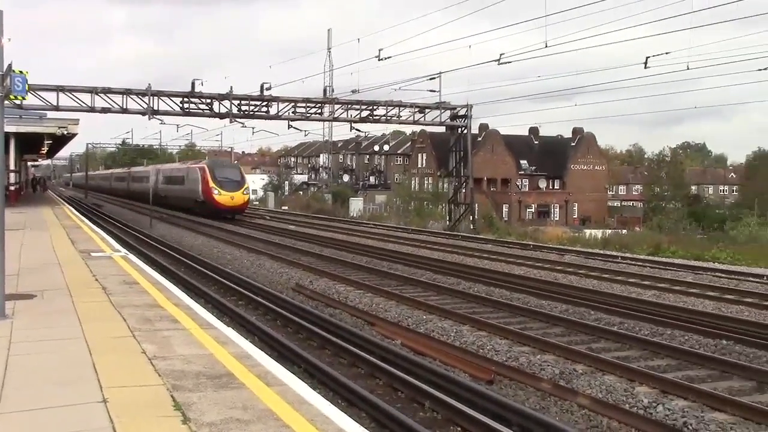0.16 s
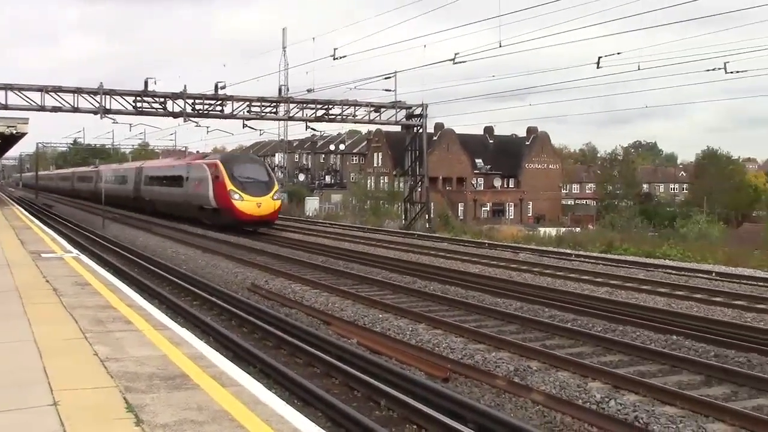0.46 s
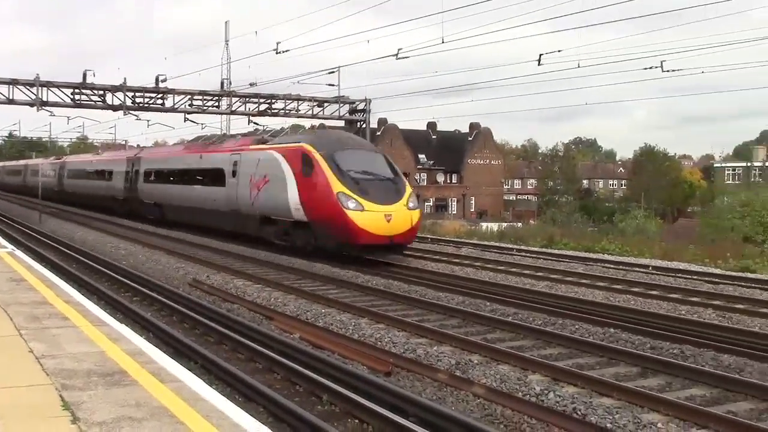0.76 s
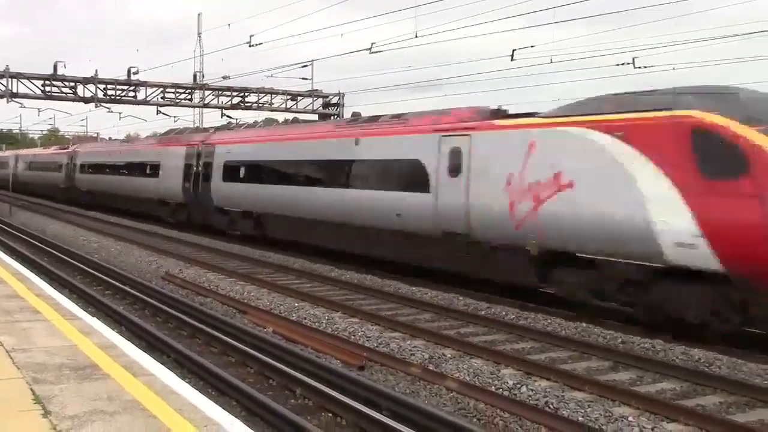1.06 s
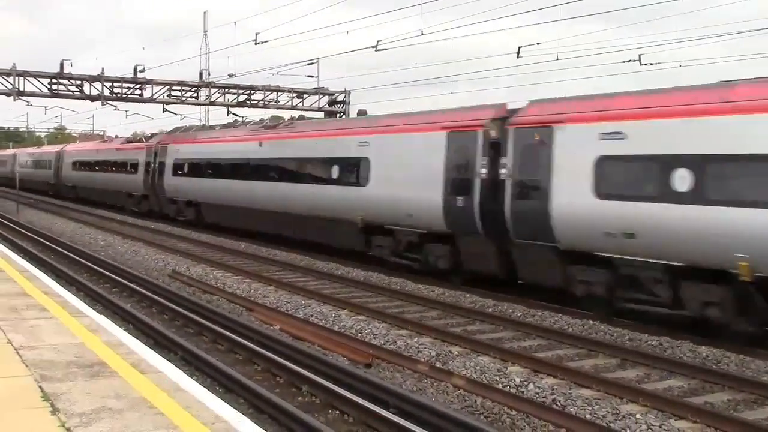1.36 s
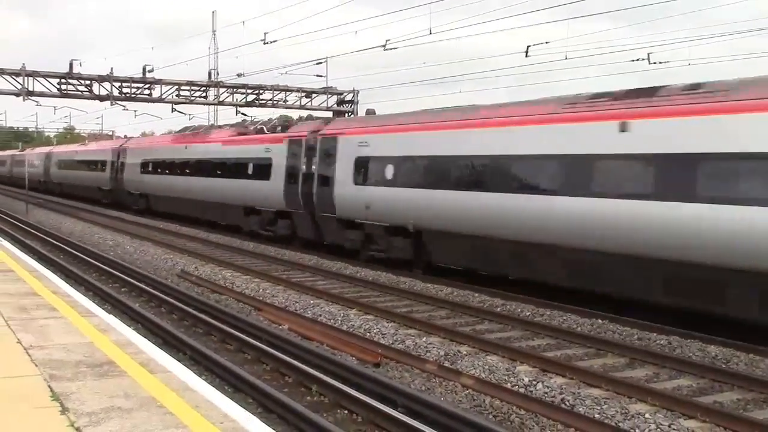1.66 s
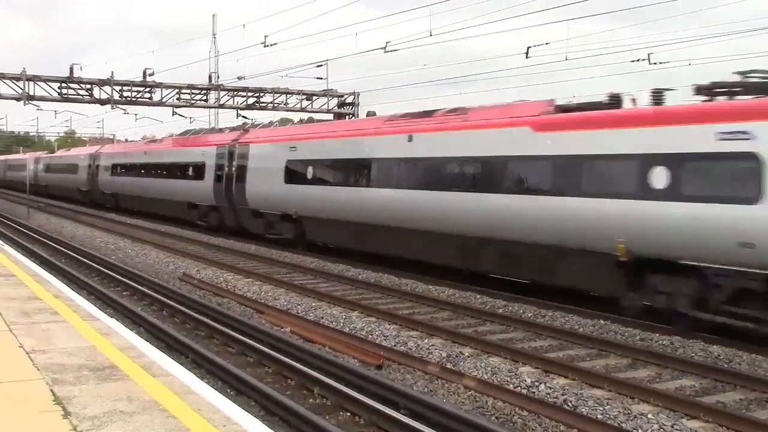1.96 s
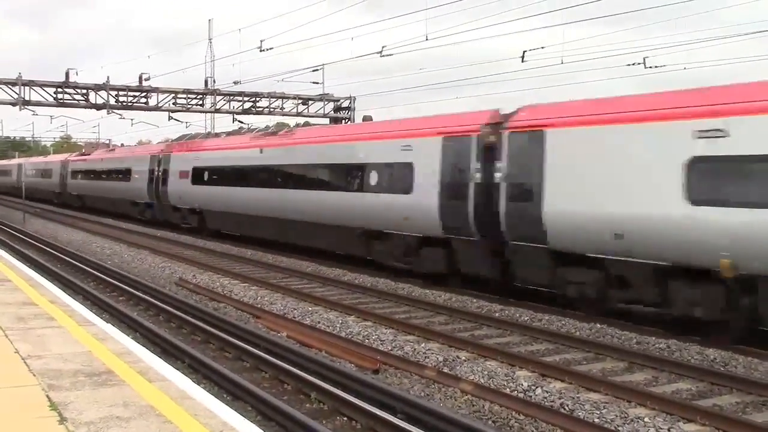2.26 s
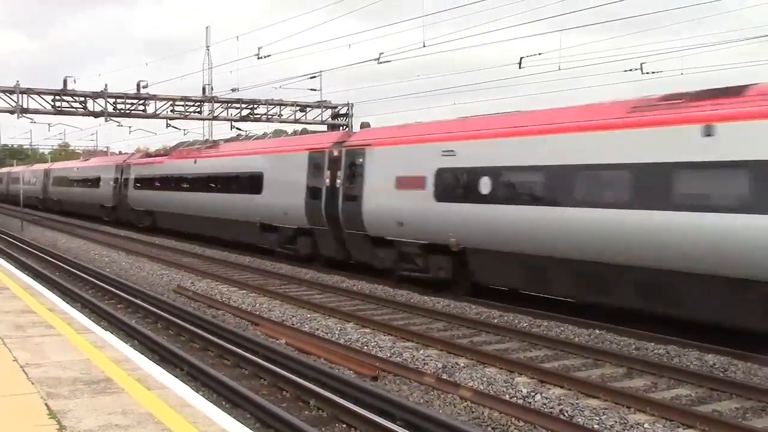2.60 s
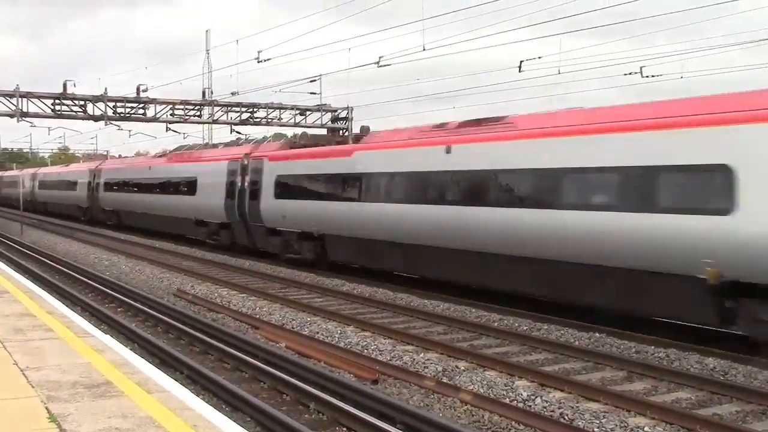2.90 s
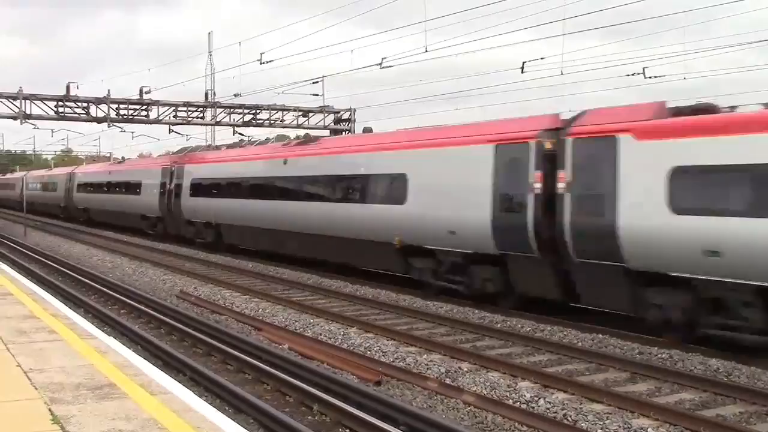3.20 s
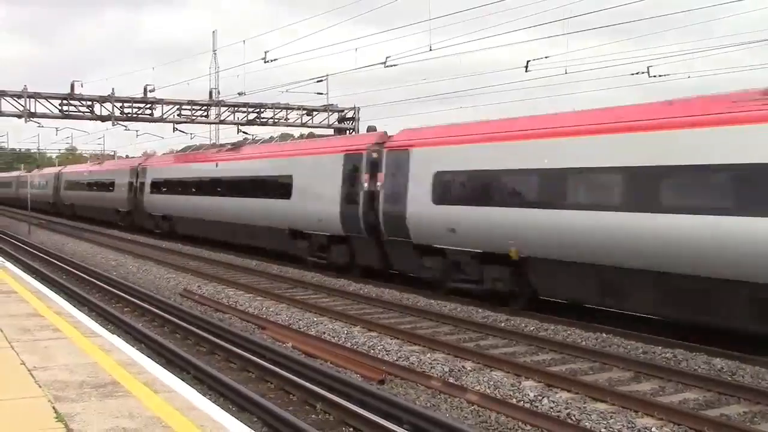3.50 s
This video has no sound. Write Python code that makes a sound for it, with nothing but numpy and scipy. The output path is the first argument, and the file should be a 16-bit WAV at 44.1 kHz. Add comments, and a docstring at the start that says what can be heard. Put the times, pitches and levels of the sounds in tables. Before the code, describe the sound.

High-speed train passing near the platform, metallic wheel rings sliding down in pitch over rail roar.

```python
"""On a station platform, the microphone about ten metres from the track: a fast electric train passes.
Its nose pushes a swell of air, the rails sing at fixed pitches, and each wheelset rings with a tone
that slides down as it goes by, over rumble, roar, rush and hiss. Whines and whistles join in.
Broad sounds are coloured noise under level curves; tones are resonances driven by noise,
with Doppler shift, distance and beam worked out for the sources that pass the microphone."""
import sys
import numpy as np
from scipy.fft import rfft, irfft
from scipy.io import wavfile
from scipy.ndimage import uniform_filter1d, minimum_filter1d

SR = 44100
rng = np.random.default_rng(int(sys.argv[2]) if len(sys.argv) > 2 else 0)


def pcm_store(signal):
    """Save signal as 16-bit PCM."""
    levels = np.round(np.clip(np.atleast_2d(signal), -1, 1) * 32767)
    wavfile.write(sys.argv[1], SR, levels.astype(np.int16).T)


N = 160965  # length in samples

# Rolling noise as the train passes. Each row: time in seconds, then levels of rumble, rail roar,
# upper rail ring, rush and hiss, each in dB before its trim.
ROLLING_LEVELS = [(0.0, -34, -36, -22.5, -33.5, -33), (0.06, -35.5, -25.5, -24, -35, -33),
                  (0.37, -29.5, -25, -21.5, -34, -34.5), (0.71, -26, -21, -19.5, -30.5, -30),
                  (0.94, -20.5, -14, -16, -27, -26), (1.16, -18.5, -16.5, -14, -24, -25.5),
                  (1.26, -20.5, -21, -19, -26, -28), (1.51, -23.5, -16.5, -16, -23.5, -25.5),
                  (1.81, -27, -24.5, -17, -28, -29), (1.89, -25, -18.5, -17, -24.5, -28),
                  (2.23, -25.5, -22.5, -17, -26.5, -31), (2.41, -25.5, -18, -15, -27.5, -29.5),
                  (2.68, -25, -22.5, -17.5, -28.5, -32.5), (3.0, -24.5, -17, -17.5, -29, -31),
                  (3.11, -26, -27, -17.5, -28.5, -34), (3.22, -26.5, -18, -17, -31, -31),
                  (3.38, -33, -27.5, -26.5, -34, -37.5), (3.65, -31.5, -29.5, -23, -35.5, -39)]
# Colours of those five layers. Each row: frequency in Hz, relative density in dB per Hz.
RUMBLE_COLOUR = [(25, -36), (45, -27), (70, -17.5), (135, -11.5), (175, -3.5), (235, 2.5), (300, -0.5),
                 (420, -4), (650, 0.5), (800, -3), (1350, -6.5), (1800, -12.5)]
ROAR_COLOUR = [(600, -25.5), (780, -7.5), (950, 0), (1060, -1.5), (1170, -6), (1300, -15.5), (1500, -24)]
RING_COLOUR = [(1400, -11), (1540, -2.5), (1620, 2), (1850, 2.5), (2080, 3.5), (2200, -3), (2400, -0.5),
               (2800, -32)]
RUSH_COLOUR = [(2100, -13), (2500, -2), (3300, 9), (3700, 5), (4200, -1), (4800, -12), (5500, -12.5),
               (7000, -48)]
HISS_COLOUR = [(4500, -2), (5800, -3), (6600, 1), (7800, -1.5), (9500, -8), (12000, -13), (13500, -19),
               (15200, -26)]
# Rail resonances. Each row: frequency in Hz, width in Hz, level in dB against the untrimmed rail ring.
RAIL_MODES = [(803, 25, -15), (946, 16, -12), (1005, 30, -14), (1055, 25, -13.5), (1152, 40, -18),
              (1617, 20, -14), (1717, 12, -14), (1879, 9, -9.5), (2078, 35, -16)]
# Steady tones heard as the train approaches. Each row: frequency in Hz, width in Hz, level in dB, middle of the
# fade in and middle of the fade out in seconds.
WHINES = [(1885, 14, -25, .55, 1.15), (2090, 35, -24, .75, 1.1), (2840, 70, -24, .48, .95),
          (6670, 130, -31.5, 0, .3), (6690, 170, -36, .4, 1.0), (10210, 70, -51, 0, .95),
          (12090, 30, -53.5, 0, 1.0), (13010, 30, -56, 0, .95)]
# Blended ring of all the wheels. Each row: frequency in Hz, relative density in dB per Hz.
WASH_COLOUR = [(2250, -15.5), (2550, 3.5), (2820, 4.5), (3120, 3), (3260, -9), (3600, -33)]
# Level of that blend. Each row: time in seconds, level in dB.
WASH_LEVEL = [(0, -30), (.3, -28.5), (.6, -23), (1.0, -19.5), (1.4, -18.5), (2.0, -18), (2.8, -23),
              (3.2, -17.5), (3.45, -26), (3.65, -32)]
# Wheelsets. Each row: second at which it is heard abreast of the microphone, ring in Hz, ring level in dB,
# lower mode level in dB, metres before the abreast point where its beam is centred;
# distance and beam then scale both levels.
WHEELSETS = [(1.31, 2690, -13, -39, 5), (1.379, 2670, -26, -19.5, 1), (1.63, 2720, -13.5, -18, 11),
             (1.76, 2700, -18.5, -22, 5), (2.11, 2700, -17, -26, 6), (2.19, 2720, -13, -19, 9.5),
             (2.31, 2710, -24.5, -22, 2), (2.58, 2680, -13, -34, 5), (2.68, 2700, -17, -21, 7),
             (2.96, 2660, -19, -23.5, 7), (3.17, 2660, -15, -23.5, 6), (3.44, 2650, -23.5, -36, 5),
             (3.55, 2680, -21, -29, 7)]
# Air pushed by the nose. Each row: frequency in Hz, relative density in dB per Hz.
NOSE_COLOUR = [(110, -12), (190, -10), (290, 6.5), (400, -14), (520, 2), (750, 3), (1400, 4.5), (2400, -5),
               (5000, -12.5), (10000, -15), (15000, -36)]
# Deep thrum of the coaches. Each row: frequency in Hz, relative density in dB per Hz.
THRUM_COLOUR = [(20, -13), (40, -24.5), (70, -8), (120, 1), (200, 6), (300, -14)]
# Whistles on the train. Each row: second at which it is heard abreast, frequency in Hz, level in dB before
# distance and beam, metres before the abreast point where the beam is centred, beam width in metres.
WHISTLES = [(1.28, 5600, -28.5, 14, 8.8), (1.82, 5580, -29, 6.7, 1.6), (1.88, 4130, -33.5, 5.3, 4.4),
            (2.2, 4120, -35, 4, 3.7)]
# Stereo width. Each row: frequency in Hz, gain of the scattered side sound in dB.
STEREO_WIDTH = [(170, -65), (260, -55), (500, -30), (1000, -19.5), (2000, -16.5), (3000, -18),
                (4500, -13.5), (8000, -13), (12000, -5)]
# Stereo drift. Each row: time in seconds, left minus right in dB before the reach below.
PAN_DRIFT = [(.5, .1), (1.6, -.5), (3.6, -.7)]
# How fully each pitch follows that drift. Each row: frequency in Hz, gain in dB.
PAN_REACH = [(200, -40), (1000, -8), (2000, 7)]

SPEED_M_S, DISTANCE_M, SOUND_M_S = 55, 10, 343
RUMBLE_DB, ROAR_DB, RING_DB, RUSH_DB, HISS_DB = 2, -1.5, -2.5, 3.5, -1  # trims of the rolling layers
FLUTTER_DB, FLUTTER_HZ = 0.65, 21.86  # rms depth, new random levels per second
WHINE_FADE_S = 0.07
LOWER_MODE_HZ, WHEEL_WIDTH_HZ = 1749, 26
WHEEL_PAIR_SPREAD = 0.008  # share by which the wheels of a pair lie above and below their mean pitch
BEAM_WIDTH_M = 9.4  # distance from a wheel's beam centre at which the beam falls to 1/e
BEAM_SPILL = 0.067  # broad spill outside the beam, strongest from far ahead
NOSE_S, NOSE_RISE_S, NOSE_FALL_S, NOSE_DB = 1, 0.23, 0.19, -17  # peak time, rise, fall, level
THRUM_FROM_S, THRUM_TO_S, THRUM_FADE_S, THRUM_DB = 0.82, 3.43, 0.56, -38.5
WHISTLE_WIDTH_HZ = 90
LIMIT, LIMIT_HOLD_S = 0.93, 0.004  # peak amplitude, window
TOP_HZ = 15200  # where the recorder's top cut reaches half amplitude


def undb(db):
    """Decibels to amplitude gain."""
    return 10 ** (np.asarray(db) / 20)


def unit(x):
    """Scale to rms 1."""
    return x / np.sqrt(np.mean(np.abs(x) ** 2))


def curve(table, axis=1):
    """One column of a table, joined by straight lines in time."""
    rows = np.array(table)
    return np.interp(np.arange(N) / SR, rows[:, 0], rows[:, axis])


def response(points, outside_db=None):
    """Gain at each frequency, joined in dB over log frequency."""
    hz, db = np.array(points).T
    f = np.maximum(np.fft.rfftfreq(N, 1 / SR), 1)
    return undb(np.interp(np.log(f), np.log(hz), db, outside_db, outside_db))


def walk(rate_hz):
    """Random levels, each held for one period and smoothed twice, at rms 1."""
    hold = int(SR / rate_hz)
    steps = np.repeat(rng.standard_normal(N // hold + 1), hold)
    smooth = uniform_filter1d(uniform_filter1d(steps, hold), hold)
    return unit(smooth[:N])


def noise(colour):
    """White noise shaped to a colour, its level fluttering a little."""
    white = rng.standard_normal(N)
    coloured = irfft(rfft(white) * response(colour, outside_db=-90), N)
    return unit(coloured) * undb(FLUTTER_DB * walk(FLUTTER_HZ))


def ring(hz, width_hz):
    """A resonance driven by random roughness; its pitch may move."""
    drive = rng.standard_normal(N) + 1j * rng.standard_normal(N)
    offset_hz = np.fft.fftfreq(N, 1 / SR)
    # 0.76 makes width_hz about the full width at half power
    swell = np.fft.ifft(drive / (1 + (offset_hz / (width_hz * 0.76)) ** 2))
    phase = 2 * np.pi * np.cumsum(hz * np.ones(N)) / SR
    return unit((swell * np.exp(1j * phase)).real)


def fade_in(at_s, length_s):
    """A smooth step from 0 to 1, half way at at_s."""
    return (1 + np.tanh((np.arange(N) / SR - at_s) / length_s)) / 2


def fly_by(passes_s, lead_m, beam_m):
    """Doppler factor and gain of a point on the train, from its distance, beam and sound delay."""
    sent_s = np.linspace(-6, 6, 6000)  # 0 is abreast of the microphone
    along_m = SPEED_M_S * sent_s
    range_m = np.hypot(along_m, DISTANCE_M)
    heard_s = passes_s + sent_s + (range_m - DISTANCE_M) / SOUND_M_S
    doppler = 1 / (1 + SPEED_M_S * along_m / range_m / SOUND_M_S)
    spill = BEAM_SPILL * (1 - along_m / range_m) / 2
    beam = spill + np.exp(-((along_m + lead_m) / beam_m) ** 2)
    gain = beam * DISTANCE_M / range_m
    t = np.arange(N) / SR
    return np.interp(t, heard_s, doppler), np.interp(t, heard_s, gain)


def rolling():
    """Rumble of the track bed, roar and ring of the rails, rush and hiss along the coaches, as noise bands."""
    layers = [
        (RUMBLE_COLOUR, RUMBLE_DB),
        (ROAR_COLOUR, ROAR_DB),
        (RING_COLOUR, RING_DB),
        (RUSH_COLOUR, RUSH_DB),
        (HISS_COLOUR, HISS_DB),
    ]
    out = np.zeros(N)
    for column, (colour, trim_db) in enumerate(layers, start=1):
        out += noise(colour) * undb(trim_db + curve(ROLLING_LEVELS, column))
    return out


def rails():
    """The rails stay in place, so their resonances hold their pitch."""
    modes = sum(undb(db) * ring(hz, width_hz) for hz, width_hz, db in RAIL_MODES)
    return modes * undb(curve(ROLLING_LEVELS, axis=3))


def whines():
    """Narrow resonances heard as the train approaches, holding their pitch and fading in and out."""
    out = np.zeros(N)
    for hz, width_hz, db, from_s, to_s in WHINES:
        present = fade_in(from_s, WHINE_FADE_S) - fade_in(to_s, WHINE_FADE_S)
        out += undb(db) * ring(hz, width_hz) * present
    return out


def wheelset(hz):
    """Two wheels of nearly the same pitch beat against each other."""
    upper = ring(hz * (1 + WHEEL_PAIR_SPREAD), WHEEL_WIDTH_HZ)
    lower = ring(hz * (1 - WHEEL_PAIR_SPREAD), WHEEL_WIDTH_HZ)
    return (upper + lower) / np.sqrt(2)


def wheels():
    """Each wheelset rings in two modes that slide down by Doppler shift, over a blended wash."""
    out = noise(WASH_COLOUR) * undb(curve(WASH_LEVEL))
    for passes_s, hz, ring_db, lower_db, lead_m in WHEELSETS:
        doppler, gain = fly_by(passes_s, lead_m, BEAM_WIDTH_M)
        main_mode = undb(ring_db) * wheelset(hz * doppler)
        lower_mode = undb(lower_db) * wheelset(LOWER_MODE_HZ * doppler)
        out += gain * (main_mode + lower_mode)
    return out


def nose():
    """A broad swell of pushed air that grows as the front nears and dies once it is past."""
    late_s = np.arange(N) / SR - NOSE_S
    rise = 1 / np.hypot(1, late_s / NOSE_RISE_S)
    fall = np.exp(-0.5 * (late_s / NOSE_FALL_S) ** 2)
    return noise(NOSE_COLOUR) * undb(NOSE_DB) * np.where(late_s < 0, rise, fall)


def thrum():
    """Deep noise of the coaches going by, faded in and out."""
    present = fade_in(THRUM_FROM_S, THRUM_FADE_S) - fade_in(THRUM_TO_S, THRUM_FADE_S)
    return noise(THRUM_COLOUR) * undb(THRUM_DB) * present


def whistles():
    """Beamed tones on the train whose pitch falls by Doppler shift as they go by."""
    out = np.zeros(N)
    for passes_s, hz, db, lead_m, beam_m in WHISTLES:
        doppler, gain = fly_by(passes_s, lead_m, beam_m)
        out += undb(db) * gain * ring(hz * doppler, WHISTLE_WIDTH_HZ)
    return out


def scene():
    """The bass stays near the centre; scattered sound widens the treble, which drifts slightly right."""
    mid = rolling() + rails() + whines() + wheels() + nose() + thrum() + whistles()
    # independent draws of the broad sources and wheels, heard only in the side signal
    scattered = irfft(rfft(rolling() + wheels() + nose()) * response(STEREO_WIDTH), N)
    pannable = irfft(rfft(mid) * response(PAN_REACH), N)
    side = scattered + pannable * (undb(curve(PAN_DRIFT) / 2) - 1)
    return np.array([mid + side, mid - side])


def record(dry):
    """The recorder ducks the highest peaks in both channels alike and cuts the top steeply."""
    size = int(LIMIT_HOLD_S * SR)
    gain = LIMIT / np.maximum(np.abs(dry).max(axis=0), LIMIT)
    limited = dry * uniform_filter1d(minimum_filter1d(gain, size), size)
    top_cut = 1 / (1 + (np.fft.rfftfreq(N, 1 / SR) / TOP_HZ) ** 160)
    return irfft(rfft(limited) * top_cut, N)


dry = scene()
out = record(dry)
pcm_store(out)
```